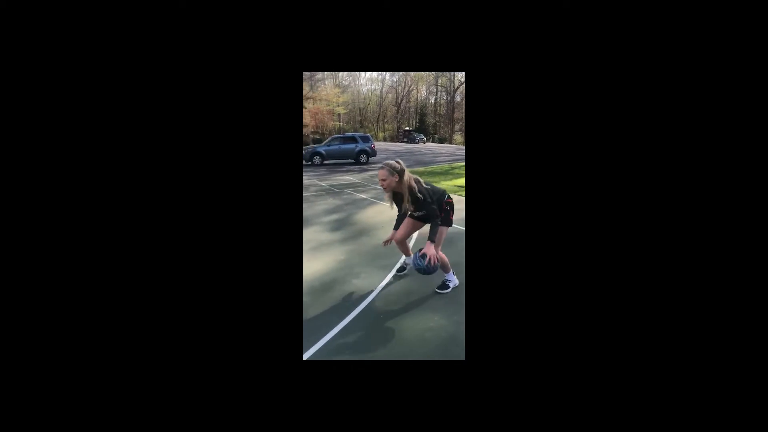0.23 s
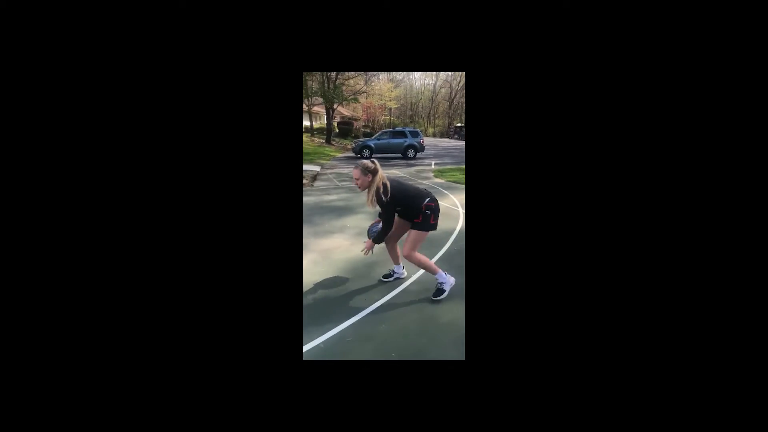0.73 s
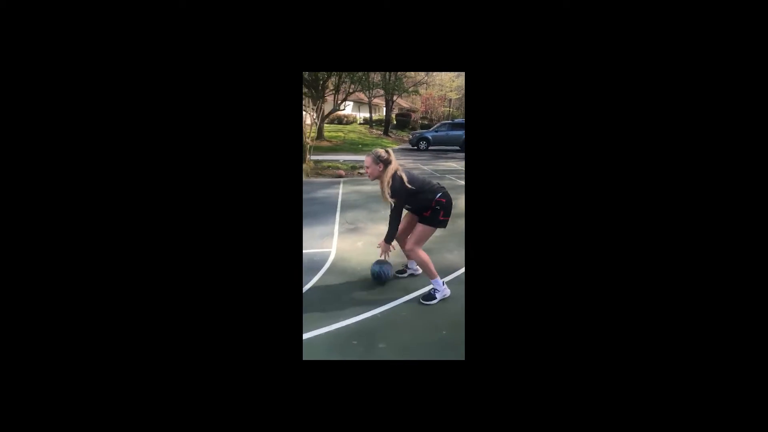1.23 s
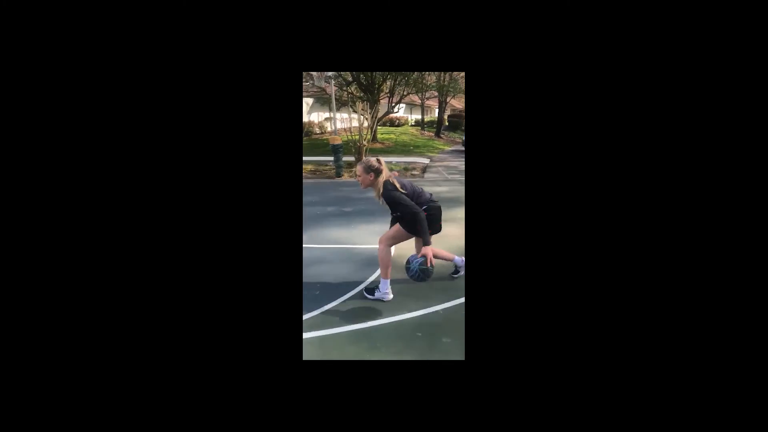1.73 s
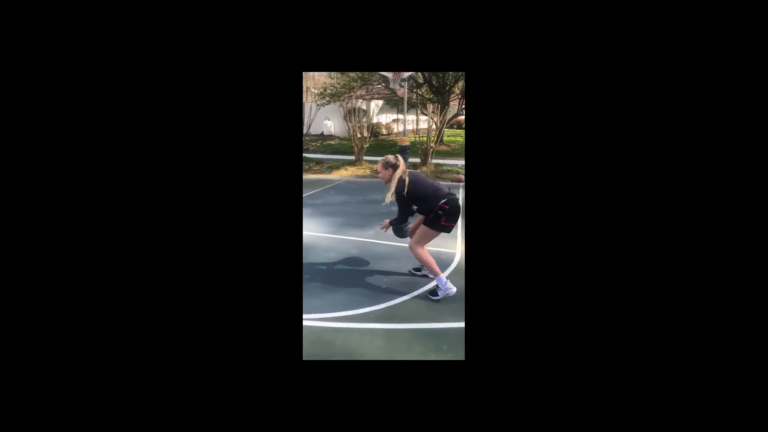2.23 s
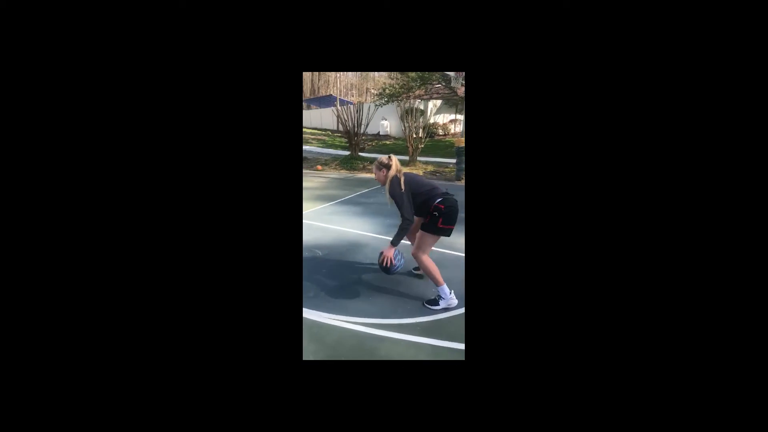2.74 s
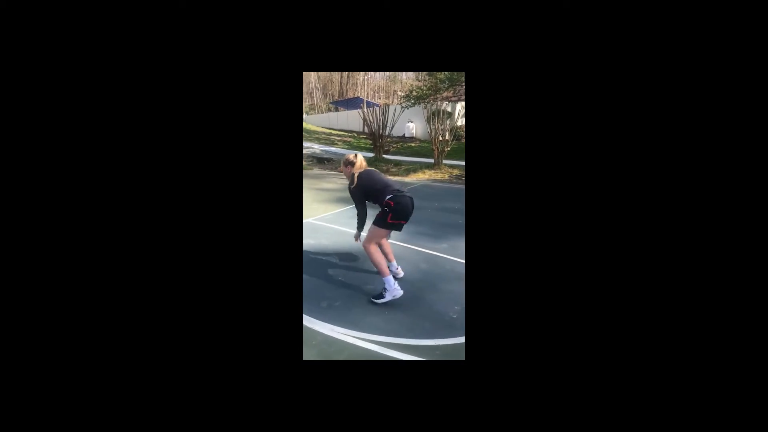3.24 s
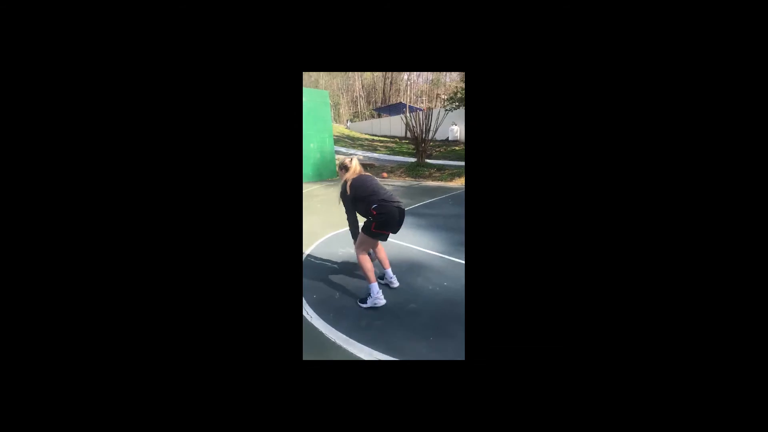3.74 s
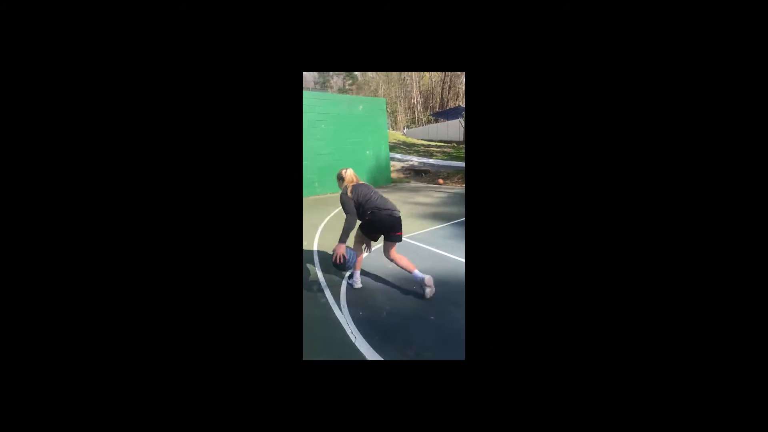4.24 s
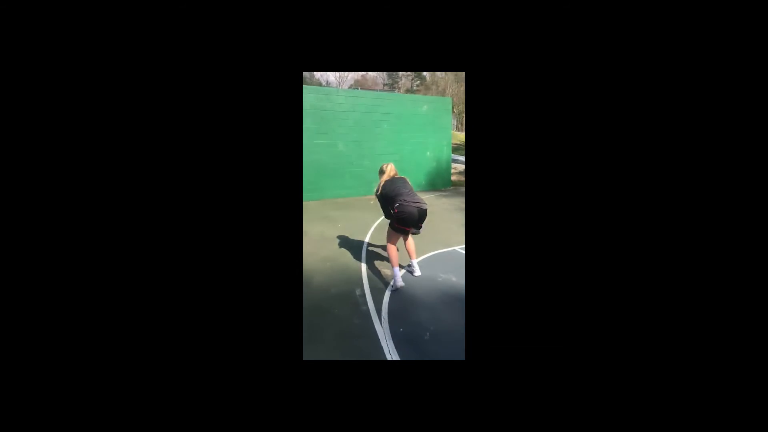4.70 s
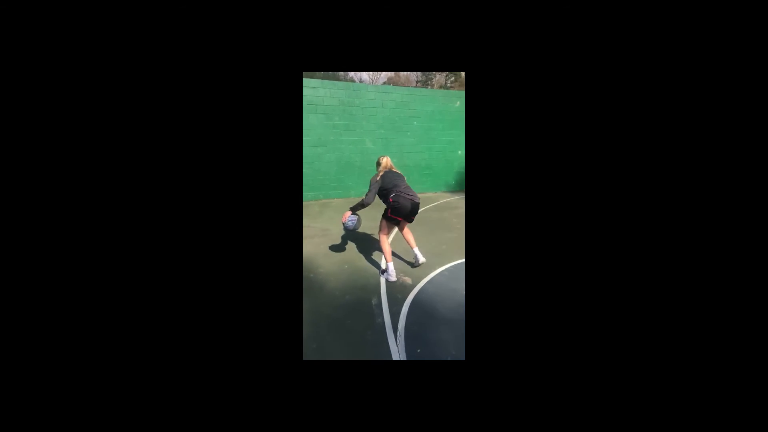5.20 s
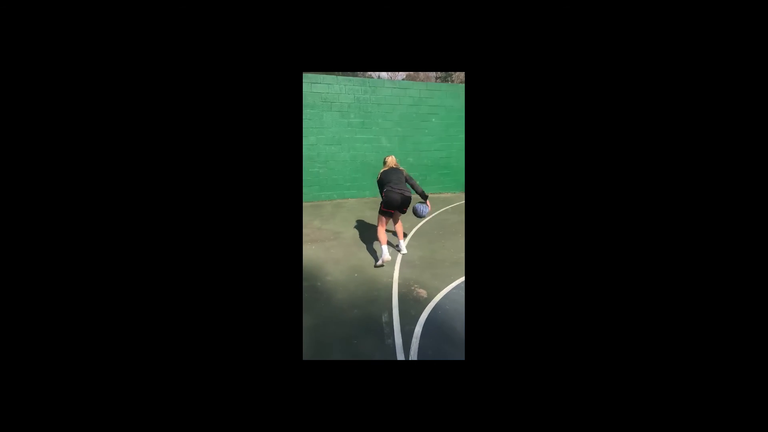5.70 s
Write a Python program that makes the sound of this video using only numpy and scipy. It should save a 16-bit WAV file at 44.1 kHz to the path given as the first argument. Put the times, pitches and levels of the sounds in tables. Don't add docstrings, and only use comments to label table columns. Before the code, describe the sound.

A basketball is dribbled hard on an outdoor court, heard fairly close throughout about six seconds. Fourteen bounces fall roughly every 0.4 seconds, slightly unevenly, from 0.08 to 5.46. Each is a crisp rubber slap with a short low thump and a faint hollow ring; the one at 1.7 is strongest, and the last ones are lighter, the final bounce bright and ringing. A short high shoe squeak comes with the first bounce. Gritty scuffs and clicks of soles fall on and between the hits, with a soft drag around 1.1-1.2, heel thuds near 1.0, 3.5, 5.1 and 5.5, and barely audible rubber chirps, clearest near 4.2. Open surroundings scatter a thin tail. A wall echo, almost absent at first, grows stronger and arrives sooner as the player approaches. Quiet low traffic hum thins slightly towards the end, under faint cloth rustle stirred by every bounce.

```python
import sys
import numpy as np
from scipy import signal
from scipy.fft import rfft, irfft, next_fast_len
from scipy.io import wavfile
from scipy.ndimage import uniform_filter1d

SR = 44100
rng = np.random.default_rng(int(sys.argv[2]) if len(sys.argv) > 2 else 0)


def transcribe(u):
    v = np.clip(np.atleast_2d(u).T, -1, 1)
    q = np.round(v * 32767).astype(np.int16)
    wavfile.write(sys.argv[1], SR, q)


def convert_level_to_amplitude(level_db):
    exponent = np.asarray(level_db, float) / 20
    return 10 ** exponent


N = 262836

# (time [s], slap peak [dB], treble share [dB], slap pitch [Hz], thump [dB])
BOUNCES = [(0.08, -7, -10.5, 1426, -22), (0.467, -13, -8, 1265, -21.5), (0.945, -8.5, -7, 1150, -21.5),
           (1.315, -10.5, -4, 1910, -21), (1.705, -4.5, -14.5, 1060, -21), (2.149, -7, -8, 1390, -20),
           (2.608, -12.5, -6, 1490, -25.5), (2.981, -10.5, -11.5, 1490, -21.5),
           (3.425, -12, -8.5, 2180, -29.5), (3.77, -10, -13, 1030, -22.5), (4.129, -9.5, -6.5, 1480, -25),
           (4.59, -10, -9, 1102, -21.5), (5.029, -12.5, -9, 1474, -36), (5.4617, -14.5, -2, 1900, -27.5)]
# (time [s], rms level [dB], resonance [Hz])
DRAG_PATH = [
    (1.021, -55, 3000),
    (1.07, -56, 3180),
    (1.11, -54, 3700),
    (1.16, -52.5, 3380),
    (1.2, -53.5, 2840),
    (1.235, -57, 2720),
    (1.245, -61, 2700),
]
# (time [s], level [dB], pitch [Hz])
SQUEAK_PATH = [
    (.086, -26., 2270),
    (.099, -27., 2320),
    (.113, -34., 2310),
    (.128, -43., 2285),
    (.184, -47., 2285),
    (.23, -56., 2280),
]


def evened(x):
    return x / np.sqrt(np.mean(x ** 2) + 1e-20)


def peaked(x):
    return x / abs(x).max()


def read(points, hz):
    f, value = np.transpose(points)
    return np.interp(np.log(hz + 1), np.log(f + 1), value)


def played(rows):
    s, *columns = np.transpose(rows)
    t = np.arange(s[0], s[-1], 1 / SR)
    return [np.interp(t, s, c) for c in columns]


def add(mix, s, sound):
    part = mix[round(s * SR):][:len(sound)]
    part += sound[:len(part)]


def colour(x, gain):
    size = next_fast_len(len(x) + 4096)
    hz = np.fft.rfftfreq(size, 1 / SR) + 1
    return irfft(rfft(x, size) * gain(hz), size)[:len(x)]


def resonate(x, hz, width):
    turn = np.exp(2j * np.pi * np.cumsum(hz * np.ones(len(x))) / SR)
    r = np.exp(-np.pi * width / SR)
    smooth = signal.lfilter([1 - r], [1, -r], x / turn + 1e-18)
    return 2 * (turn * smooth).real


def ringing(t, modes, spread_db, lift_db):
    hz, db, t60 = np.transpose(modes)[:, :, None]
    spin, phase = rng.standard_normal((len(modes), 2, 1)).transpose(1, 0, 2)
    level = convert_level_to_amplitude(db + lift_db(hz) + spread_db * spin - 60 * abs(t) / t60)
    return (level * np.sin(2 * np.pi * (hz * t + phase))).sum(0) * (t >= 0)


def squeeze(t, hz, cycles, phase):
    contact = np.clip(t * hz / cycles, 0, 1)
    return np.sin(np.pi * contact ** 0.65) ** 2 * np.cos(2 * np.pi * (hz * t + phase))


def traffic():
    # (frequency [Hz], density [dB per Hz])
    hum_bands = [(18, -33), (30, -8), (92, -1.5), (151, -4.5), (184, -9), (253, -4), (274, -16),
                 (334, -6.5), (376, -23), (416, -6), (497, -21), (1320, -22), (3500, -36.5), (4550, -45),
                 (7700, -120)]
    # (time [s], level [dB])
    hum_level = [
        (0.0, -46.5),
        (2.6, -46.5),
        (4.2, -48),
        (5.6, -48),
        (5.96, -51),
    ]
    # (frequency [Hz], bandwidth [Hz], rms level [dB])
    drones = [
        (469.4, 24.5, -55.5),
        (1345, 3.7, -72.5),
        (545, 14, -66),
    ]
    frames, hz = N // 512 + 5, np.fft.rfftfreq(2048, 1 / SR)
    a, b, patches = rng.standard_normal((frames, 1025, 3)).T
    patches = uniform_filter1d(patches, size=16, axis=0)
    patches = evened(uniform_filter1d(patches, size=8, axis=1))
    z = (a + 1j * b) * convert_level_to_amplitude(read(hum_bands, hz)[:, None] + 2.1 * patches)
    hum = evened(signal.istft(z, nperseg=2048, noverlap=1536)[1][:N])
    s, db = np.transpose(hum_level)
    swell = convert_level_to_amplitude(np.interp(np.arange(N) / SR, s, db))
    tones = sum(convert_level_to_amplitude(d) * evened(resonate(rng.standard_normal(N), f, w)) for f, w, d in drones)
    return swell * (convert_level_to_amplitude(-0.45) * hum + tones / np.median(swell))


def rustle():
    # (frequency [Hz], density [dB per Hz])
    cloth_bands = [(1500, -12.), (3000, -2.), (4500, -3.), (6500, -8.), (9000, -14.), (11500, -21.),
                   (12500, -34.), (14000, -55.), (16000, -70.)]
    rest_db, stir_db, stir_s = -71.5, 9.5, 0.099
    since = np.arange(N) / SR - np.transpose(BOUNCES)[:1].T
    db = rest_db + stir_db * (np.exp(-abs(since) / stir_s) * (since > 0)).sum(0)
    flicker = evened(uniform_filter1d(rng.standard_normal(N), size=500))
    hiss = evened(colour(rng.standard_normal(N), lambda hz: convert_level_to_amplitude(read(cloth_bands, hz))))
    return hiss * convert_level_to_amplitude(db + 0.65 * flicker)


def yard(x):
    # (frequency [Hz], t60 [s])
    decay = [(100, 0.083), (400, 0.85), (1200, 0.6), (3000, 0.66), (8000, 0.6), (16000, 0.88)]
    thin = colour(x, lambda hz: 1 / np.sqrt(1 + (60.0 / hz) ** 2))
    at, out = np.arange(300, SR - 20, 20), np.zeros(N)
    for k in range(3):
        taps = np.zeros(SR)
        taps[at + rng.integers(0, 20, len(at))] = rng.choice([-1., 1.], len(at))
        hz, t, z = signal.stft(taps, SR, nperseg=256)
        fade = convert_level_to_amplitude(-60 * t / read(decay, hz)[:, None])
        tail = signal.istft(z * fade, SR, nperseg=256)[1]
        share = np.cos(np.pi * (np.arange(N) / SR * .8 + k / 3)) * np.sqrt(2 / 3)
        out += signal.fftconvolve(thin * share, tail / np.linalg.norm(tail))[:N]
    return out


def wall(x):
    gap_m, walk_m_per_s, sound_m_per_s = 8.5, .8, 343
    echo_db, echo_db_per_m = -8.5, -2
    off_axis_db, off_axis_s = -31, 1
    t = np.arange(N) / SR
    gap = gap_m - walk_m_per_s * t
    db = echo_db + echo_db_per_m * (gap - gap[-1]) + off_axis_db * np.exp(-t / off_axis_s)
    late = np.interp(t - 2 * gap / sound_m_per_s, t, x) * convert_level_to_amplitude(db)
    n = np.arange(3000)
    smear = .1 * np.exp(-n / 100.) + .045 * np.exp(-n / 900.)
    rough = np.r_[3.0, rng.standard_normal(3000) * smear]
    late = signal.oaconvolve(late, rough / np.linalg.norm(rough))[:N]
    return colour(late, lambda hz: 1 / np.sqrt(1 + (hz / 7100.0) ** 4) / np.sqrt(1 + (1000.0 / hz) ** 2))


def chirp(length, db, hz):
    u = np.linspace(0, 1, round(length * SR))
    whistle = evened(resonate(rng.standard_normal(len(u)), hz, 45.))
    return convert_level_to_amplitude(db) * whistle * np.sqrt(np.sin(np.pi * u) + 1e-9)


def squeak():
    throb_per_s, throb_db, throb_top_s = 70., 13., .099
    db, hz = played(SQUEAK_PATH)
    t = SQUEAK_PATH[0][0] + np.arange(len(db)) / SR
    db = db - throb_db * np.sin(np.pi * throb_per_s * (t - throb_top_s)) ** 2
    uneven = evened(uniform_filter1d(rng.standard_normal(len(hz)), size=60))
    turns = np.cumsum(hz * (1 + .012 * uneven)) / SR
    return convert_level_to_amplitude(db) * (np.sin(2 * np.pi * turns) + .22 * np.sin(4 * np.pi * turns))


def drag():
    db, hz = played(DRAG_PATH)
    grit = rng.standard_normal(len(db))
    hiss = colour(grit, lambda f: convert_level_to_amplitude(-3.0 * np.log2(f / 2500.0) ** 2))
    hollow = evened(resonate(grit, hz, 810.0))
    return convert_level_to_amplitude(db) * evened(hollow + 0.25 * evened(hiss))


def scuff(length, db, hz):
    u = np.linspace(0, 1, round(length * SR))
    rise, hold = np.clip(0.0031 / length, .05, .4), 0.68
    grit = rng.standard_normal(len(u)) * convert_level_to_amplitude(9.0 * np.minimum(rng.exponential(1, len(u)), 3))
    grit = colour(grit, lambda f: convert_level_to_amplitude(-7.0 * np.log2(f / hz) ** 2 * np.where(f > hz, 1.15, .35)))
    stroke = np.clip(u / rise, 0, 1) * np.clip((1.05 - u) / (1.05 - hold), 0, 1)
    return convert_level_to_amplitude(db) * evened(grit) * stroke


def bounce(count, s, slap_db, treble_db, slap_hz, thump_db):
    # (frequency [Hz], level [dB])
    slap_bands = [(300, 2.5), (600, -0.5), (1200, 2), (2500, 2), (5000, -6.5), (8000, -20), (12000, -34),
                  (16000, -78)]
    # (frequency [Hz], level [dB], t60 [s])
    cavity_modes = [
        (1012, -36., .45),
        (1765, -44., .6),
        (2200, -50., .4),
        (2775, -47., .6),
        (2905, -41., .8),
        (3330, -53., .3),
    ]
    # (frequency [Hz], level [dB], t60 [s])
    skin_modes = [(339, -13.5, 0.033), (437, -20.5, 0.12), (495, -22, 0.081), (637, -26, 0.083),
                  (780, -14.5, 0.014)]
    # (frequency [Hz], level [dB], t60 [s])
    lift_modes = [(1150, -1, 0.012), (1480, -7, 0.025), (2080, -23.5, 0.016)]
    # (thump lead [s], thump length [cycles], court thud [dB], thud lead [s], slap decay [s])
    sides = [
        (.0019, 3.48, -21.5, 0.0013, 0.0028),
        (0.000067, 2.68, -27.5, 0.00062, 0.0028),
    ]
    free = {2: (-2.2, 12.3, -2.), 4: (7.3, 4.1, -9), 5: (2., 3.7, 5.3), 6: (-8, 0.1, 4.6),
            7: (-2., 0.1, 2.9), 8: (3, 3., 2.1), 9: (1.7, 2.7, 3.7), 13: (3., 10.8, 12)}
    lead_s, cycles, thud_db, thud_s, slap_s = sides[count % 2]
    muffled_db = (-6.5, -13.5, -11)
    low_db, high_db, flutter_db = np.add(muffled_db, free.get(count, 0))
    tick_hz = 2.34 * slap_hz
    knock_db = -8 + 1 * s
    t = np.arange(SR // 2) / SR - .004
    on = t >= 0

    tick = .55 * rng.standard_normal(len(t)) * on * np.exp(-abs(t) / .0007)
    tick[np.argmax(on)] += 3.0
    tick += .45 * np.roll(uniform_filter1d(tick, size=4), rng.integers(40, 100))

    def contact(hz):
        bump = 1 + 0.26 / (1 + ((hz / tick_hz - 1) / 0.2) ** 2)
        return convert_level_to_amplitude(read(slap_bands, hz)) / (1 + (2350.0 / hz) ** 2) * bump

    tick = peaked(colour(tick, contact))

    turns = slap_hz * (0.838 * t + 0.00053 * (1 - np.exp(-abs(t) / 0.0013)))
    patch = np.sin(2 * np.pi * turns) * on * np.exp(-(abs(t) / slap_s) ** 1.1)
    spread = rng.standard_normal(len(t)) * on * np.exp(-abs(t) / 0.0027)

    def dull(hz):
        knock = knock_db * np.clip(np.log2(1000.0 / hz), 0, 1)
        return convert_level_to_amplitude(read(slap_bands, hz) + knock) / (1 + (hz / 2320.0) ** 4)

    body = peaked(0.66 * patch + peaked(colour(spread, dull)))

    skin = ringing(t, skin_modes, 0.99, lambda hz: 0.08 * knock_db)
    lifted = t - .009
    skin += ringing(lifted, lift_modes, 2.0, lambda hz: flutter_db) * np.clip(lifted / 0.0018, 0, 1)

    air = ringing(t, cavity_modes, 1.2, lambda hz: np.where(hz < 1500, low_db, high_db))
    air *= 1 - np.exp(-abs(t) / .025)
    waver = evened(uniform_filter1d(rng.standard_normal(len(t)), size=1800))
    air *= convert_level_to_amplitude(1.5 * waver)

    slap = convert_level_to_amplitude(treble_db + 8.5) * tick * (t > -.0002) + convert_level_to_amplitude(-2.0) * body * on + skin + air
    slap = colour(slap, lambda hz: 1 / (1 + (hz / 12600.0) ** 6))
    thump = convert_level_to_amplitude(thump_db + 11.0) * squeeze(t + lead_s, 217.7, cycles, 0.45)
    thud = convert_level_to_amplitude(thud_db) * squeeze(t + thud_s, 96.6, 2.15, 0.26)
    return convert_level_to_amplitude(slap_db - 0.5) * slap + thump + thud


def scene():
    # (start [s], length [s],
    # rms level [dB], centre [Hz])
    scuffs = [(0.082, 0.025, -41, 4000), (0.148, 0.1, -67.5, 6000), (0.334, 0.075, -68, 5800),
              (0.54, 0.013, -53, 2370), (0.994, 0.022, -41.5, 3740), (1.319, 0.03, -39.5, 5400),
              (1.394, 0.012, -51.5, 2600), (1.452, 0.034, -61, 3440), (1.611, 0.029, -62, 5360),
              (1.684, 0.036, -45, 6000), (1.78, 0.02, -58, 2400), (2.185, 0.024, -38.5, 4630),
              (2.328, 0.015, -50, 5570), (2.567, 0.023, -48, 3500), (2.917, 0.089, -47.5, 5000),
              (2.922, 0.044, -47, 1490), (2.979, 0.023, -45.5, 3230), (3.471, 0.02, -36.5, 4800),
              (3.76, 0.035, -39, 5700), (4.04, .03, -70, 6900), (4.146, 0.018, -41, 5330),
              (4.676, 0.021, -42.5, 5150), (4.797, 0.018, -59, 6500), (5.066, 0.017, -49, 5160),
              (5.19, 0.012, -70, 6100), (5.505, 0.018, -54, 6960), (5.525, 0.02, -49.5, 5200)]
    # (time [s], rms level [dB], centre [Hz])
    grit_bits = [(0.493, -47.5, 6600), (.514, -65, 5000), (.668, -60, 5770), (1.504, -58, 2500),
                 (1.572, -68, 9000), (2.619, -51, 5000), (2.715, -62, 6000), (2.84, -61, 3500),
                 (2.888, -63, 8000), (3.367, -59.5, 3500), (3.575, -62, 7500), (3.604, -63, 8000),
                 (3.886, -61, 7500), (4.252, -50, 5900), (4.313, -69, 8000), (4.602, -46, 4500),
                 (4.814, -48.5, 4930), (5.043, -56, 5000), (5.25, -62, 6940), (5.263, -63, 6000),
                 (5.347, -57, 3500), (5.41, -57, 3000), (5.477, -52, 4500), (5.648, -65, 6500)]
    # (time [s], peak [dB], frequency [Hz])
    steps = [
        (0.992, -27, 207),
        (1.759, -40, 300),
        (2.189, -33, 200),
        (3.459, -23.5, 194),
        (4.191, -30, 310),
        (4.62, -30, 230),
        (5.056, -23, 215),
        (5.49, -25, 217),
    ]
    # (start [s], length [s], level [dB], frequency [Hz])
    chirps = [
        (1.19, 0.13, -64, 2570),
        (1.49, 0.13, -67, 2490),
        (3.87, 0.024, -60, 2540),
        (4.185, 0.033, -53.5, 1460),
        (4.285, 0.023, -65, 2000),
    ]
    near = np.zeros(N)
    for count, row in enumerate(BOUNCES):
        add(near, row[0] - .0038, bounce(count, *row))
    for s, *stroke in scuffs:
        add(near, s, scuff(*stroke))
    for s, db, hz in grit_bits:
        add(near, s, scuff(0.0053, db, hz))
    for s, db, hz in steps:
        add(near, s, convert_level_to_amplitude(db) * squeeze(np.arange(SR // 20) / SR, hz, 1.7, rng.random()))
    add(near, DRAG_PATH[0][0], drag())
    far = wall(near) + convert_level_to_amplitude(-19.5) * yard(near) + traffic() + rustle()
    add(near, SQUEAK_PATH[0][0], squeak())
    for s, *slip in chirps:
        add(near, s, chirp(*slip))
    return (near + far)[None]


def top_cut(x):
    return signal.sosfilt(signal.butter(12, 16500, fs=SR, output="sos"), x)


def record(dry):
    cycles = 1.12

    def lag(hz):
        return np.exp(-2j * np.pi * (cycles * np.log(hz / 9000.) - hz * cycles / 9000.))

    def cut(hz):
        bass = 1 / np.sqrt(1 + (50.4 / hz) ** 14)
        treble = 1 / np.sqrt(1 + (hz / 9870.0) ** 6)
        return bass * treble * (hz < 16350)

    mix = colour(dry[0], lambda hz: lag(hz) * cut(hz))[None]
    return top_cut(mix)


dry = scene()
out = record(dry)
transcribe(out)
```